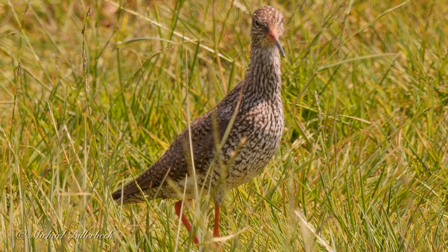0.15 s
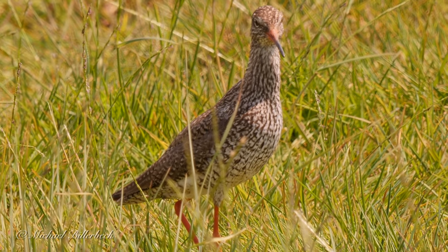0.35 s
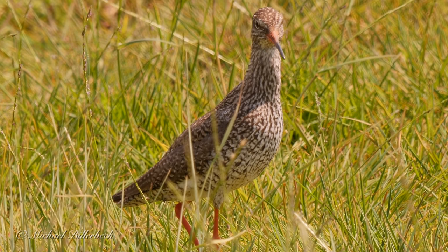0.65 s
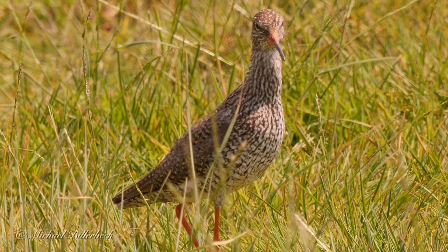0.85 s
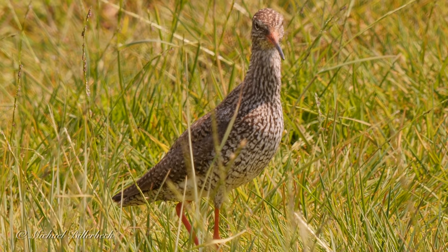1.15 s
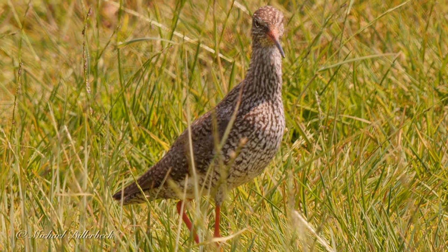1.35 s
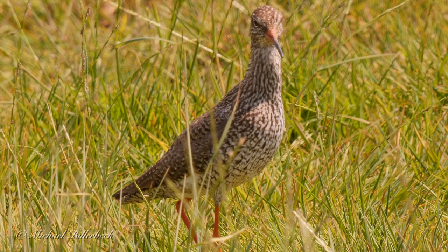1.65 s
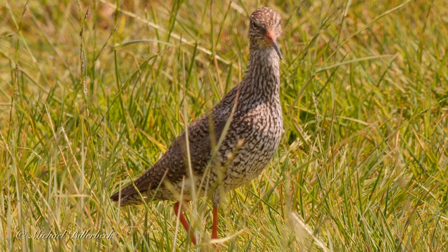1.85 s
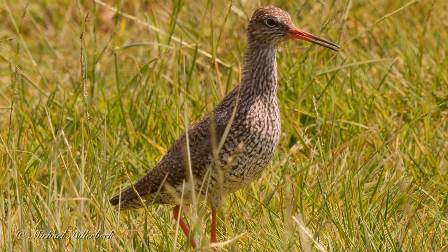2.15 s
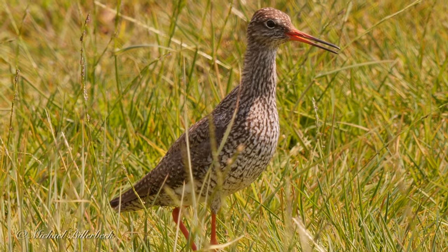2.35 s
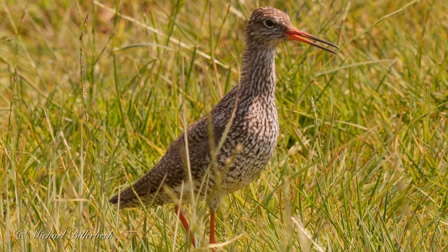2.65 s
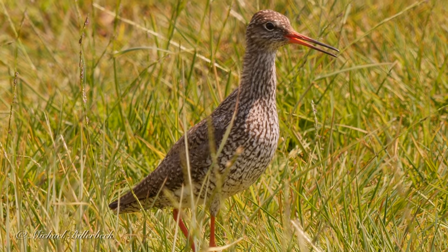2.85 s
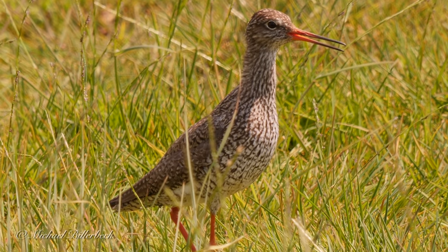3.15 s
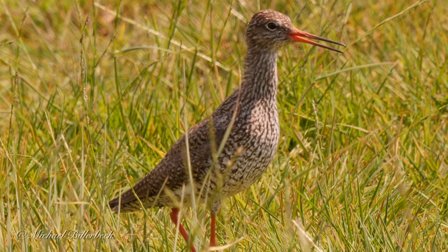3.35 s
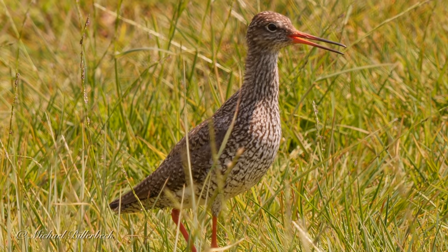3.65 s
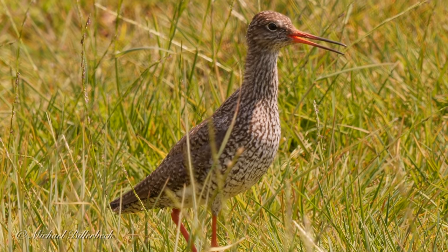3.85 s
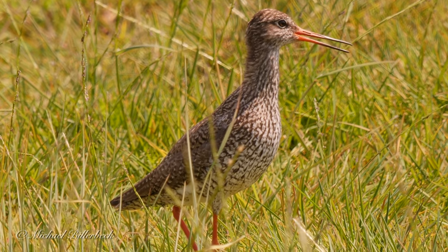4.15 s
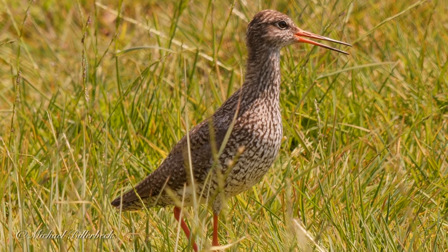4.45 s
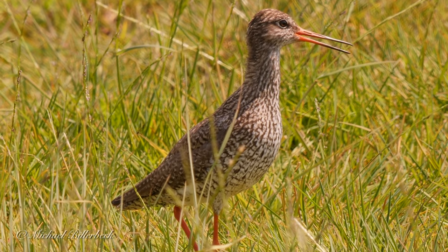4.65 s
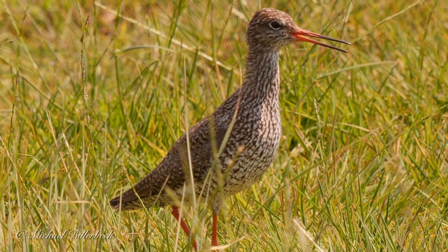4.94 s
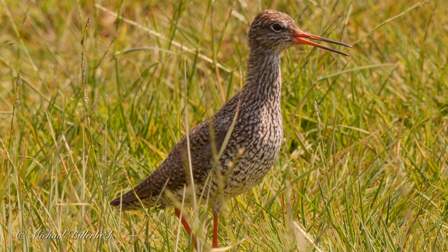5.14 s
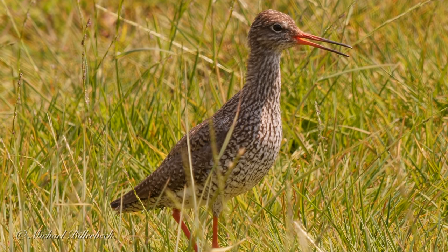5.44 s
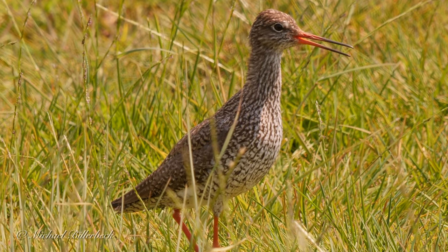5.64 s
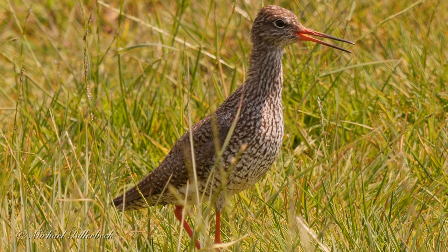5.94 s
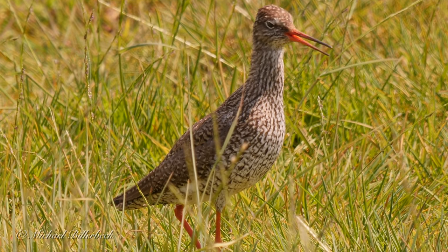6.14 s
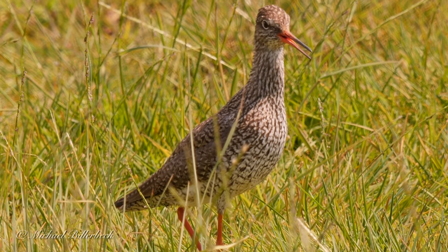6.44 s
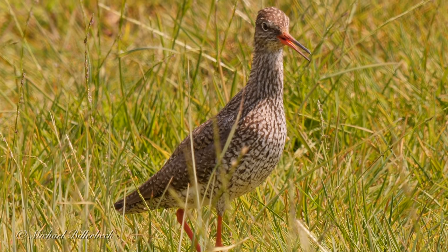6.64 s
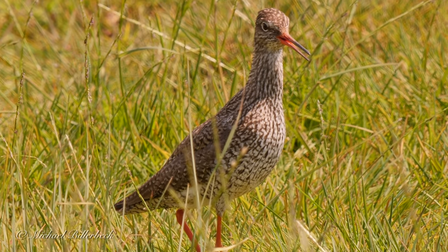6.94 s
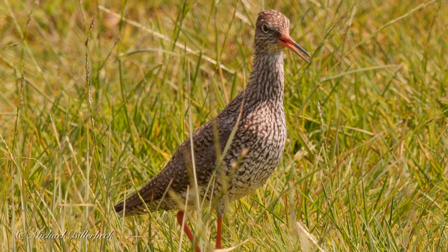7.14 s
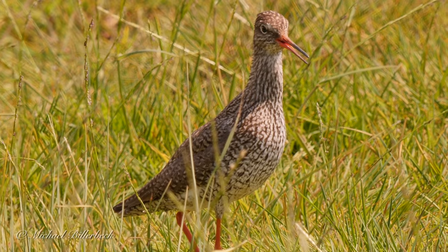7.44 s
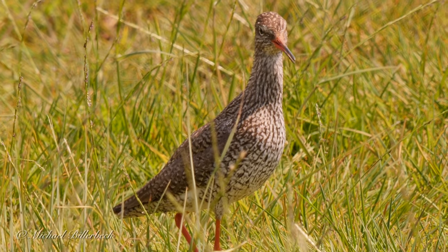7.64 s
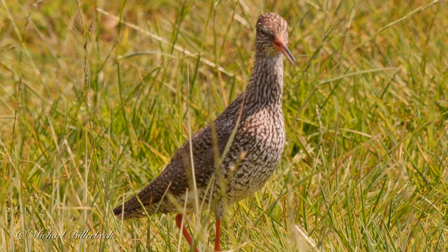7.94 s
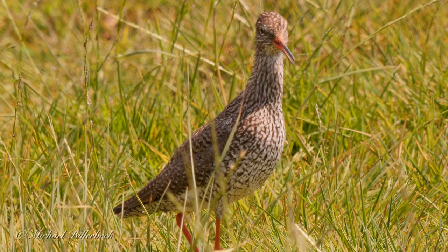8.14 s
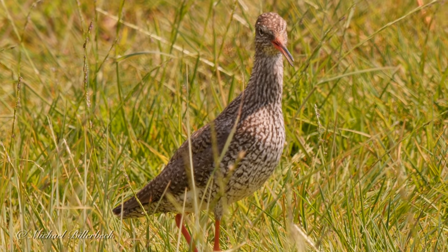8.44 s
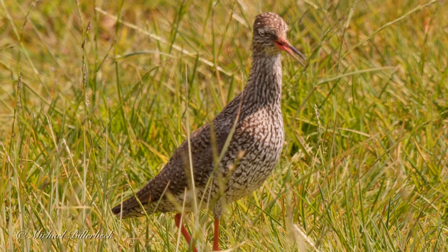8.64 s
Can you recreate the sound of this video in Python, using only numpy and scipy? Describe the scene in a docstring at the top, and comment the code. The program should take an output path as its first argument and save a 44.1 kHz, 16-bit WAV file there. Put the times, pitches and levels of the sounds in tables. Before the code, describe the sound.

A redshank in a wet meadow gives five separate sharp whistled calls, each breaking into a rasp and squeal, over faint distant birds and soft haze.

```python
"""Redshank over a wet meadow

A redshank gives five sharp calls: an arched whistle that breaks into a rasp and ends in a reedy squeal.
A second bird wails and rattles over the first call. Both voices are harmonics coloured by a throat.
Farther off, gulls cry in rolling pulses and small birds whistle in gliding sines.
Beneath lie a low motor throb that stumbles about once a second, a breeze and a haze of filtered noise,
and a far colony blurred into a wash."""
import sys
import numpy as np
from scipy import signal
from scipy.fft import rfft, irfft, next_fast_len
from scipy.io import wavfile
from scipy.ndimage import uniform_filter1d, map_coordinates

SR = 44100
rng = np.random.default_rng(int(sys.argv[2]) if len(sys.argv) > 2 else 0)


def int16_out(signal):
    """Quantize to a 16-bit WAV file."""
    q = np.round(np.clip(np.atleast_2d(signal).T, -1, 1) * 32767)
    wavfile.write(sys.argv[1], SR, q.astype(np.int16))


N = 387638
TIME = np.arange(N) / SR
HARMONICS = np.arange(1, 16)[:, None]
CUTOFF_HZ = 15900   # top of the sound
RELEASE_S = .012   # shared by the redshank, the answering bird and the gulls


# the near bird's calls, one row each: start_s, settle_s, rise_s, fall_s, rasp_s, squeal_s, crest_hz,
#   squeal_hz, entry_db, crest_db, break_db, rasp_db, squeal_db, catch_db (dip in the onset), rough (0-1)
REDSHANK_CALLS = [ (.815, 0.0051, 0.0079, 0.03, .018, 0.046, 1027, 900, -23, -24, -23, -33, -30, 15, 0.56),
                  (2.356, .026, 0.028, 0.04, 0.025, .058, 1035, 920, -20.5, -19.5, -26, -29.5, -27.5, 5, .65),
                  (3.915, .026, 0.075, .058, .096, 0.058, 1100, 944, -18.5, -16, -24, -32.5, -26.5, 3, 0.83),
                  (5.788, .015, 0.093, .050, 0.075, 0.049, 1126, 969, -20, -13.5, -19, -28.5, -24, 1, 0.65),
                  (7.764, 0.014, 0.075, 0.05, 0.059, 0.046, 1124, 947, -19, -16, -22.5, -30.5, -27, 15, 0.64)]
# whistle spectrum, led by the third harmonic: harmonic (number), level_db
WHISTLE_TONE = [(1, -18.5), (2, -19.5), (3, 3.5), (4, -24), (5, -27.5), (6, -32), (7, -37.5), (8, -30.5),
                (9, -35.5), (10, -35.5), (11, -39), (12, -50), (15, -70)]
# throat colour in the break and rasp: freq_hz, level_db
BREAK_THROAT = [(900, -18), (1900, -23), (2400, -35), (2850, -8), (3300, -5), (3700, 5), (4100, -6),
                (4750, -13), (5600, -19), (7500, -34.5), (10000, -35), (12500, -45), (15000, -57)]
# throat colour with the bill open in the squeal: freq_hz, level_db
SQUEAL_THROAT = [(900, -13.5), (1900, -18.5), (2400, -8), (2850, 0), (3700, -3), (4100, 4.5), (4750, -4.5),
                 (5600, -12.5), (7500, -16.5), (8700, -26.5), (10000, -16.5), (12500, -34), (15000, -51)]


def redshank():
    """The near bird: the whistle splits, drops into a rasp on one throat resonance, then opens to a squeal."""
    out = np.zeros(N)
    for start, *call in REDSHANK_CALLS:
        span, t = stretch(start, ONSET_S + sum(call[:5]))
        pitch, db, whistle, rasp, gape = redshank_gesture(t, *call)
        hz = HARMONICS * pitch
        reed_db = gape * at_hz(SQUEAL_THROAT, hz) + (1 - gape) * at_hz(BREAK_THROAT, hz)
        # gentler calls have a duller top
        tilt_db = 1.3 * (db.max() + 14.5) * np.log2(np.maximum(hz / 4200, 1))
        harmonic_db = whistle * at_hz(WHISTLE_TONE, HARMONICS) + (1 - whistle) * reed_db + tilt_db
        # the harder the bird blows, the more its cycles alternate before the break
        split = np.minimum(2.2 * rasp * whistle * from_db(db + 14), .5) + .12 * gape
        voice = syrinx(pitch, harmonic_db, rasp, BREAK_THROAT,
                       jitter=.04, burst_db=11, burst_hz=230, hiss=.6, split=split)
        out[span] += from_db(db) * voice
    return out


ONSET_S, ATTACK_S = 0.01488, 0.0061   # a scratchy scoop opens each call
SCOOP_HZ, ENTRY_HZ, SETTLED_HZ = 883.4, 1051, 1010   # the pitch overshoots, then settles before it climbs
BREAK_HZ, RASP_END_HZ = 932.5, 864   # where the whistle breaks, and how far the rasp sags
FALL_POWER = 2.5   # the whistle falls off its crest ever faster
SCOOP_DB, SQUEAL_FADE_DB = -3, -3.5   # against the entry and the squeal's start
FALTER_DB = 2.5   # the whistle falters just before it breaks
CATCH_WEAKENS = 0.23   # share of the catch by which the scoop before it is held back
PURITY, PURITY_PER_DB = 0.9, .04   # whistle share at a crest of -14.5 dB; a louder call is purer
SCOOP_RASP, SQUEAL_RASP = 0.61, 0.38   # roughness 0-1
SQUEAL_WOBBLE, SQUEAL_WOBBLE_HZ = 0.0062, 29.66   # share of pitch, rate of chance drift


def redshank_gesture(t, settle_s, rise_s, fall_s, rasp_s, squeal_s, crest_hz, squeal_hz,
                     entry_db, crest_db, break_db, rasp_db, squeal_db, catch_db, rough):
    """One call's pitch, level, purity, roughness and bill opening: scoop, whistle, break, rasp, squeal."""
    lengths = [settle_s, rise_s, fall_s, rasp_s, squeal_s]
    settled, crest, breaks, opens, end = ONSET_S + np.cumsum(lengths)
    frays, sagged = breaks + 0.278 * rasp_s, breaks + 0.815 * rasp_s
    release = end - RELEASE_S
    climb = np.sin(np.pi / 2 * ramps(t, (settled, 0), (crest, 1)))
    fall = ramps(t, (crest, 0), (breaks, 1))
    gape = .5 + .5 * np.tanh((t - opens + 0.0047) / 0.0088)
    # pitch
    pitch = ramps(t, (0, SCOOP_HZ), (ONSET_S, ENTRY_HZ),
                  (ONSET_S + settle_s / 2, ENTRY_HZ - 8), (settled, SETTLED_HZ))
    pitch += (crest_hz - SETTLED_HZ) * climb + (BREAK_HZ - crest_hz) * fall ** FALL_POWER
    pitch += ramps(t, (breaks, BREAK_HZ), (frays, BREAK_HZ - 8), (sagged, RASP_END_HZ),
                   (opens, squeal_hz), (release, squeal_hz), (end, BREAK_HZ)) - BREAK_HZ
    pitch *= 1 + SQUEAL_WOBBLE * gape * drift(SQUEAL_WOBBLE_HZ, len(t))
    # level
    scoop_db = entry_db + SCOOP_DB
    db = ramps(t, (0, entry_db - 17), (ATTACK_S, scoop_db - CATCH_WEAKENS * catch_db),
               (.65 * ONSET_S, scoop_db - catch_db), (ONSET_S, entry_db))
    db += (crest_db - entry_db) * climb ** 1.3 + (break_db - crest_db) * fall ** 2
    db -= FALTER_DB * np.sin(np.pi * fall ** 3)
    db += ramps(t, (breaks, break_db), (breaks + rasp_s / 2, rasp_db), (opens, squeal_db),
                (release, squeal_db + SQUEAL_FADE_DB), (end, squeal_db - 33)) - break_db
    # tone
    purity = PURITY + PURITY_PER_DB * (crest_db + 14.5)
    whistle = ramps(t, (ATTACK_S, .1), (ONSET_S, .7), (settled, .56), (crest, purity)) * (1 - fall ** 3)
    rasp = ramps(t, (ATTACK_S, SCOOP_RASP), (ONSET_S, .1), (settled, 0), (crest, 0), (breaks, .15),
                 ((breaks + frays) / 2, .25), (frays, rough), (sagged, 0.82 * rough), (opens, SQUEAL_RASP))
    return pitch, db, np.clip(whistle, 0, 1), np.clip(rasp, 0, 1), gape


def syrinx(pitch, harmonic_db, rasp, throat, jitter, burst_db, burst_hz, hiss, split=0):
    """A membrane's harmonics, power near 1; in a rasp its cycles scatter, hiss and come in bursts."""
    size, rasp = len(pitch), np.clip(rasp, 0, 1)
    phase = 2 * np.pi * np.cumsum(pitch * (1 + jitter * rasp * drift(350, size))) / SR
    gains = from_db(harmonic_db) * (HARMONICS * pitch < CUTOFF_HZ)
    lag = 0.566 * HARMONICS ** 2   # the windpipe smears each pulse in time
    tone = np.sqrt(2) * np.sum(gains * np.cos(HARMONICS * phase - lag), axis=0)
    tone = tone / np.sqrt(np.sum(gains ** 2, axis=0))
    tone = tone * (1 + split * np.cos(phase / 2))   # strong and weak cycles alternate
    air = hiss * rasp * noise(throat, size) * (1 + np.cos(phase))
    bursts = from_db(burst_db * rasp ** 2 * np.tanh(drift(burst_hz, size)))
    voice = (tone + air) * bursts
    return voice / np.sqrt(uniform_filter1d(voice ** 2, size=700) + 1e-9)


ANSWER_START_S, ANSWER_ATTACK_S, WAIL_S, RATTLE_S = .845, 0.056, 0.153, .18
WAIL_BASE_HZ, WAIL_CREST_HZ, WAIL_CREST_S, WAIL_WIDTH_S = 1325, 1570, .08, .032
WAIL_DB, RATTLE_DB, RATTLE_FADE_DB_PER_S = -28.5, -38, 67
# the second bird's throat colour: freq_hz, level_db
ANSWER_THROAT = [(1250, -29), (1600, -2.5), (2700, -2.5), (3200, 4), (4150, -1.5), (4800, -16), (6500, -23),
                 (8200, -17), (9500, -25), (14000, -40)]


def answering_bird():
    """A higher, wailing note over the first call that frays into a dull rattle as it fades."""
    out = np.zeros(N)
    span, t = stretch(ANSWER_START_S, WAIL_S + RATTLE_S)
    frayed = WAIL_S + RELEASE_S
    hump = np.exp(-.5 * ((t - WAIL_CREST_S) / WAIL_WIDTH_S) ** 2)
    pitch = WAIL_BASE_HZ + (WAIL_CREST_HZ - WAIL_BASE_HZ) * hump
    db = ramps(t, (0, WAIL_DB - 10), (ANSWER_ATTACK_S, WAIL_DB), (WAIL_S, WAIL_DB - 3.0), (frayed, RATTLE_DB))
    db -= RATTLE_FADE_DB_PER_S * np.maximum(t - frayed, 0)
    rasp = ramps(t, (ANSWER_ATTACK_S, .35), (WAIL_S, .06), (frayed, .58))
    hz = HARMONICS * pitch
    # the rougher the voice, the duller its top
    harmonic_db = at_hz(ANSWER_THROAT, hz) - 14 * rasp * np.log2(np.maximum(hz / 4000, 1))
    voice = syrinx(pitch, harmonic_db, rasp, BREAK_THROAT, jitter=0.089, burst_db=16, burst_hz=150, hiss=0.39)
    out[span] = from_db(db) * voice
    return out


# small birds' hooked, falling chips: start_s, length_s, pitch_hz, level_db
CHIPS = [(.427, 0.032, 3215, -35), (1.17, .03, 4750, -52), (1.243, 0.019, 3850, -40),
         (1.885, 0.03, 3850, -52), (2.655, 0.036, 4100, -52), (2.835, 0.039, 3700, -57),
         (4.325, .035, 3400, -59), (5.31, 0.032, 3400, -58), (5.48, 0.059, 4040, -61),
         (5.635, .035, 3440, -58), (6.26, 0.038, 3430, -60), (6.9, 0.044, 3300, -54),
         (7.22, 0.037, 3380, -52), (7.52, 0.031, 3460, -47.5), (8.745, 0.03, 3370, -59)]
# arched peeps: start_s, length_s, crest_hz, level_db
PEEPS = [(1.745, 0.13, 4820, -60), (1.79, 0.031, 2504, -45.5), (2.165, 0.065, 2580, -49.5),
         (2.955, .11, 3670, -52.5), (6.46, 0.074, 2810, -52.5), (6.55, 0.079, 2830, -50),
         (6.74, .09, 3120, -51.5), (8.21, 0.12, 4180, -57.5)]
# quick upward flicks: start_s, pitch_hz, level_db
FLICKS = [(.003, 4150, -47), (0.017, 4000, -48), (0.413, 3450, -48), (1.21, 4080, -39.5),
          (1.227, 4220, -47), (1.78, 3850, -48.5), (2.17, 3750, -49.5)]
FLICK_S = .013
# long thin whistles: start_s, length_s, middle_hz, level_db, glide (share of pitch),
#   arch (share of pitch), trill (0-1)
WHISTLES = [(0.098, 0.52, 4640, -60, -0.13, 0.0028, 0.69), (0.512, 0.31, 4530, -56.5, -0.29, 0.034, 0),
            (1.312, 0.42, 4450, -59.5, -0.31, 0, 0.67), (6.091, 0.1, 4200, -64, -0.0013, 0, 0),
            (6.322, 0.28, 4430, -58.5, 0, -.03, 0), (6.329, 0.66, 3434, -61, 0.16, -.02, 0),
            (6.78, .12, 4170, -64, -0.3, 0, 0), (7.332, 0.21, 2730, -60, 0.023, .015, 0)]
# buzzing notes: start_s, length_s, pitch_hz, level_db
BUZZES = [(.44, .06, 3120, -57), (3.25, 0.23, 4230, -56.5), (3.55, 0.14, 3750, -53.5),
          (4.365, .055, 4400, -61), (4.51, 0.056, 4300, -58.5), (4.655, 0.05, 4280, -58)]
# lower hoots from far across the meadow: start_s, length_s, pitch_hz, level_db
HOOTS = [(.03, 0.2, 1110, -53), (.28, 0.32, 1123, -55.5), (3.57, .09, 1165, -49), (8.54, 0.23, 1120, -53.5)]


def far_birds():
    """The birds around the meadow; each kind of small note has its own glide, arch and waver."""
    flicks = [(start, FLICK_S, hz, db) for start, hz, db in FLICKS]
    strays = stray_notes(count=110, low_hz=2680, high_hz=4570, length_scale_s=.07, top_db=-60.5)
    out = gulls()
    out += small_birds(CHIPS, glide=-0.233, arch=0.091)
    out += small_birds(PEEPS, glide=0, arch=.09)
    out += small_birds(flicks, glide=0.14, arch=.02)
    for *note, glide, arch, trill in WHISTLES:
        out += small_birds([note], glide, arch, trill=trill)
    out += small_birds(BUZZES, glide=-0.079, arch=0.0097, waver=.057, waver_hz=403, flutter_db=2.5)
    out += small_birds(HOOTS, glide=-0.072, arch=0, waver=0.056, waver_hz=130, flutter_db=0.5)
    return out + small_birds(strays, glide=-0.117, arch=.05, flutter_db=4.5)


GULL_ATTACK_S, GULL_FADE_DB = 0.03, -4   # each cry fades while it is held
GULL_ROLL_PER_S, GULL_ROLL_SLIDE = 46.5, 0.084   # pulses a second; slide as share of pitch at full rasp
TAIL_START_HZ, TAIL_END_HZ, TAIL_DB = 798, 676, -5   # the falling tail; level against the cry
TAIL_RASP = .35   # roughness 0-1
# distant gulls: start_s, held_s, tail_s, crest_hz, arch (share of pitch), level_db, hoarse (0-1),
#   bright_db (per octave above 1900 Hz, up to 0.6 octave)
GULL_CRIES = [(1.235, 0.27, .2, 971, .035, -44.5, 0.63, 10), (3.045, .28, .13, 954, .025, -42, 0.57, 0.5),
              (4.76, .26, .15, 964, .03, -44.5, 0.58, -7), (7.92, .11, 0.011, 862, 0.022, -46.5, .2, 2),
              (8.0, .17, 0.0069, 936, .09, -44.5, 0.08, -1), (8.04, 0.43, .01, 977, .02, -51, 0.27, -1)]
# gull throat colour: freq_hz, level_db
GULL_THROAT = [(700, -6.5), (950, -7), (1400, -22), (1900, 3.5), (2300, 3), (2850, -10), (3300, -16),
               (3800, -11), (4700, -20), (5800, -31), (9000, -52)]


def gulls():
    """Hoarse rolling cries: a quick train of pulses, each sliding up in pitch, then a falling tail."""
    out = np.zeros(N)
    for start, held_s, tail_s, crest_hz, arch, level_db, hoarse, bright_db in GULL_CRIES:
        end = held_s + tail_s + RELEASE_S
        span, t = stretch(start, end)
        tail = ramps(t, (held_s - RELEASE_S, 0), (held_s + RELEASE_S, 1))
        held_hz = crest_hz * (1 - arch * np.cos(np.pi * t / held_s) ** 2)
        tail_hz = ramps(t, (held_s, TAIL_START_HZ), (end, TAIL_END_HZ))
        pitch = (1 - tail) * held_hz + tail * tail_hz
        db = level_db + ramps(t, (0, -12), (GULL_ATTACK_S, 0), (held_s / 2, 0), (held_s, GULL_FADE_DB),
                              (held_s + 0.98 * tail_s, TAIL_DB), (end, -14))
        rasp = (1 - tail) * hoarse + tail * TAIL_RASP
        roll = 2 * np.pi * GULL_ROLL_PER_S * t + 0.86 * drift(10.2, len(t))
        pitch = pitch * (1 + GULL_ROLL_SLIDE * rasp * np.sin(roll))
        hz = HARMONICS * pitch
        harmonic_db = at_hz(GULL_THROAT, hz) + bright_db * np.clip(np.log2(hz / 1900), 0, .6)
        voice = syrinx(pitch, harmonic_db, rasp, GULL_THROAT, jitter=.02, burst_db=3, burst_hz=60, hiss=.42)
        pulses = 1 + np.minimum(0.97 * rasp, 1) * np.cos(roll)
        out[span] += from_db(db) * voice * pulses
    return out


TRILL_GLIDE, TRILL_THROB = .03, 1.5   # trill depth in pitch and in loudness, as shares


def small_birds(notes, glide, arch, waver=0.002, waver_hz=90, flutter_db=1, trill=0):
    """Each note is one sine gliding along an arc, swelling and fading; a trill is strongest early on."""
    out = np.zeros(N)
    for start, length, middle_hz, db in notes:
        span, t = stretch(start, length)
        u, size = np.clip(t / length, 0, 1), len(t)   # u: progress through the note
        depth = trill * np.sin(np.pi * u) * (1 - u)
        roll = 2 * np.pi * 55 * t + .5 * drift(7.0, size)
        pitch = middle_hz * (1 + glide * (u - .5) - arch * (2 * u - 1) ** 2)
        pitch = pitch * (1 + waver * drift(waver_hz, size) + TRILL_GLIDE * depth * np.sin(roll))
        swell = np.sqrt(2 * np.abs(np.sin(np.pi * u))) * from_db(db + flutter_db * drift(33.5, size))
        throb = 1 + TRILL_THROB * depth * np.cos(roll)
        out[span] += swell * throb * np.sin(2 * np.pi * np.cumsum(pitch) / SR)
    return out


def stray_notes(count, low_hz, high_hz, length_scale_s, top_db):
    """Notes of far birds at chance times, lengths, pitches and levels."""
    when, long, high, loud = rng.random((count, 4)).T
    starts, lengths = when * (TIME[-1] - .05), length_scale_s * (0.394 + long)
    return np.transpose([starts, lengths, low_hz + high * (high_hz - low_hz), top_db - 7 * loud])


MOTOR_HZ = 40.55   # pulse rate between stumbles
STUMBLE_FIRST_S, STUMBLE_EVERY_S, THUD_DB = .646, 1.065, -38.5   # a steady pace
# motor pulse spectrum: multiple (of the pulse rate), level_db
MOTOR_ORDERS = [(1, -57.5), (2, -51), (3, -53.5), (4, -55), (5, -64), (6, -76), (7, -70)]


def motor():
    """Low pulses; at each stumble they hurry and give way to a short, dull thud."""
    stumbles = np.arange(STUMBLE_FIRST_S, TIME[-1], STUMBLE_EVERY_S)
    share = sum(np.exp(-.5 * ((TIME - s) / 0.02015) ** 2) for s in stumbles)
    rate_hz = MOTOR_HZ * (1 + 0.0854 * share + 0.0033 * drift(6.3, N))
    phase = 2 * np.pi * np.cumsum(rate_hz) / SR
    pulses = sum(np.sqrt(2) * from_db(db) * np.cos(k * phase) for k, db in MOTOR_ORDERS)
    thud_noise = noise([(25, -5), (50, 4), (110, -2), (250, -13), (400, -25.5)], N)
    thuds = from_db(THUD_DB) * share * thud_noise
    return pulses * (1 - 1.03 * share) * from_db(1.5 * drift(9.7, N)) + thuds


WIND_DB = -50.5   # between gusts
# the breeze's gusts: middle_s, half_length_s, rise_db
GUSTS = [(.45, .3, 2), (8.75, 0.16, 5)]
# wind rumble colour: freq_hz, level_db (per Hz)
RUMBLE = [(15, -7), (30, -1.5), (45, 3), (80, -7), (140, -9), (250, -13), (400, -24.5)]


def breeze():
    """A light wind rumbles on the microphone: low noise that swells in gusts."""
    return swelling(WIND_DB, GUSTS) * noise(RUMBLE, N)


COLONY_DB = -52   # between swells
# swells of the far chorus: middle_s, half_length_s, rise_db
COLONY_SWELLS = [(3.5, 0.24, 5.5), (4.712, 0.21, 4.5), (6.15, 0.19, 5.5), (7.082, .25, 5), (8.2, 0.13, 4.5)]
# far chorus colour: freq_hz, level_db (per Hz)
COLONY = [(1200, -36), (1550, 0.5), (1850, 1), (2150, -6.5), (2450, -44)]


def colony():
    """The blurred chorus of a far bird colony, whose many calls add up to an even wash."""
    notes = stray_notes(count=130, low_hz=1653, high_hz=2202, length_scale_s=.16, top_db=0)
    voices = small_birds(notes, glide=-0.0635, arch=0.0498, waver=0.0221, waver_hz=118.2, flutter_db=4.0)
    chorus = rms_one(meadow(voices, t60=0.27)) + 0.66 * noise(COLONY, N)
    chorus = chorus / np.sqrt(uniform_filter1d(chorus ** 2, size=9000))   # even out the level
    return swelling(COLONY_DB, COLONY_SWELLS) * chorus


HAZE_DB = -48.5
# colour of the still air: freq_hz, level_db (per Hz)
HAZE = [(180, -27), (300, -10.5), (397, -3), (543, -8.5), (1000, -4), (1370, -4), (1590, -2), (1870, -1),
        (2100, -4), (2440, -9), (2880, -15.5), (3870, -16), (5950, -26.5), (15500, -28.5)]


def haze():
    """Still air: steady, softly coloured noise."""
    return from_db(HAZE_DB) * noise(HAZE, N)


def meadow(x, t60):
    """Faint scatter from grass and banks that dies away smoothly, by 60 dB in t60 seconds."""
    t = TIME[:SR // 2]
    scatter = rng.standard_normal(len(t)) * from_db(-60 * t / t60) * (t > .006)
    return signal.fftconvolve(x, scatter / np.sqrt(np.sum(scatter ** 2)))[:N]


def from_db(db):
    """Decibels to gain."""
    return 10 ** (np.asarray(db) / 20)


def rms_one(x):
    """Scale to unit power."""
    return x / np.sqrt(np.mean(x ** 2) + 1e-20)


def at_hz(points, hz):
    """Read a spectrum in dB on a log-frequency axis."""
    freq, db = np.transpose(points)
    return np.interp(np.log(np.maximum(hz, 1)), np.log(freq), db)


def noise(spectrum, size):
    """Noise of a given colour, rms 1, falling steeply beyond twice its last frequency."""
    length = next_fast_len(size)
    hz = np.arange(length // 2 + 1) * SR / length
    gain = from_db(at_hz(spectrum, hz)) / (1 + (hz / spectrum[-1][0] / 2) ** 8)
    return rms_one(irfft(rfft(rng.standard_normal(length)) * gain, length)[:size])


def drift(rate_hz, size):
    """Smooth chance wandering of spread about 1: a curve through two random knots per cycle."""
    knots = rng.standard_normal(int(size * rate_hz * 2 / SR) + 4)
    return map_coordinates(knots, [1 + np.arange(size) * rate_hz * 2 / SR], order=3, mode="nearest")


def swelling(db, swells):
    """A steady level with smooth humps on it, as gain."""
    humps_db = sum(rise_db * np.exp(-.5 * ((TIME - s) / width) ** 2) for s, width, rise_db in swells)
    return from_db(db + humps_db)


def stretch(start, length):
    """The samples that a note covers, and the time since its start."""
    span = slice(max(int(start * SR), 0), min(int((start + length) * SR), N))
    return span, TIME[span] - start


def ramps(t, *points):
    """An envelope through (s, value) points."""
    s, values = np.transpose(points)
    return np.interp(t, np.maximum.accumulate(s), values)


def scene():
    """Everything arrives from straight ahead; only a thin hiss differs between the ears."""
    near, far = redshank() + answering_bird(), far_birds()
    front = near + from_db(-32) * meadow(near, t60=0.33)
    front += far + from_db(-11) * meadow(far, t60=0.29)
    front += motor() + breeze() + colony() + haze()
    hiss = [noise([(2000, -27), (4000, -14), (6000, 6.5), (15500, 6)], N) for side in range(2)]
    return front + from_db(-62.5) * np.array(hiss)


def record(dry):
    """A steep low-pass cuts off the top."""
    low_pass = signal.ellip(10, .1, 80, CUTOFF_HZ, fs=SR, output="sos")
    return signal.sosfilt(low_pass, dry)


dry = scene()
out = record(dry)
int16_out(out)
```